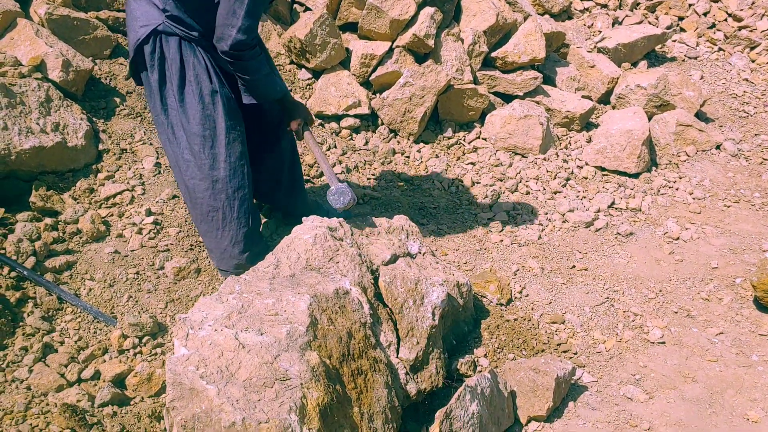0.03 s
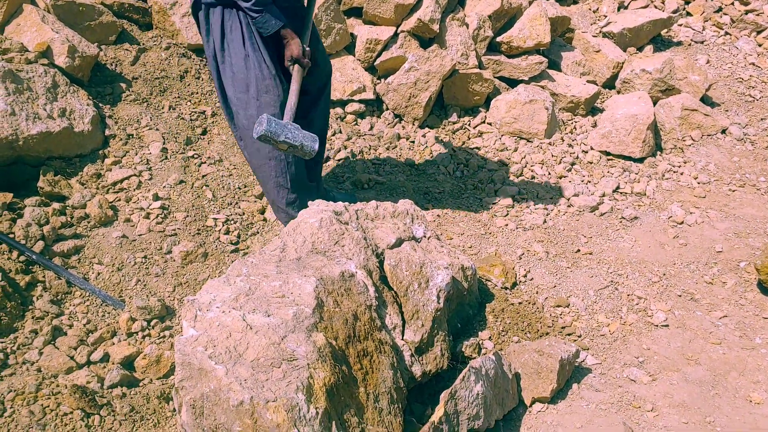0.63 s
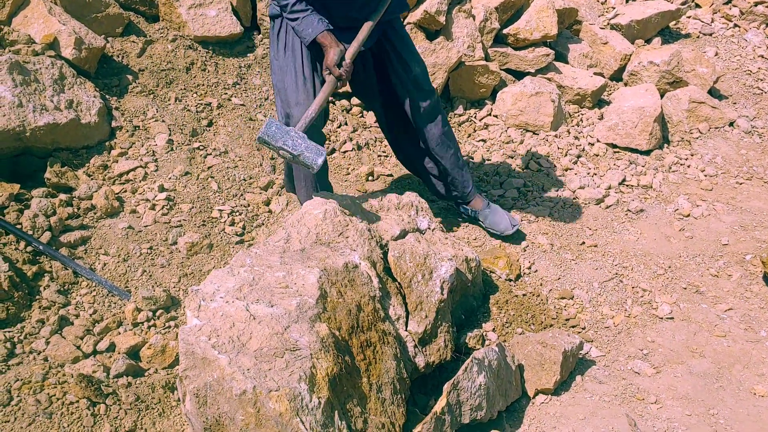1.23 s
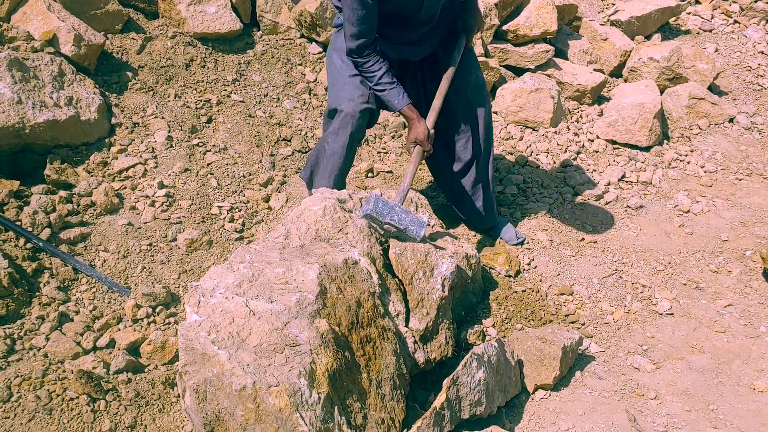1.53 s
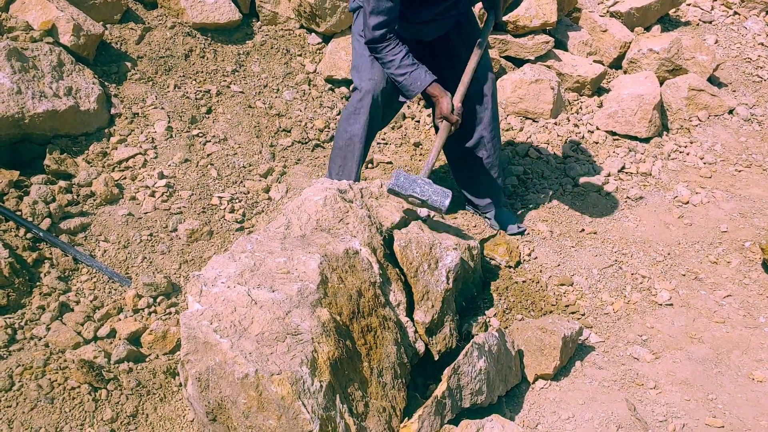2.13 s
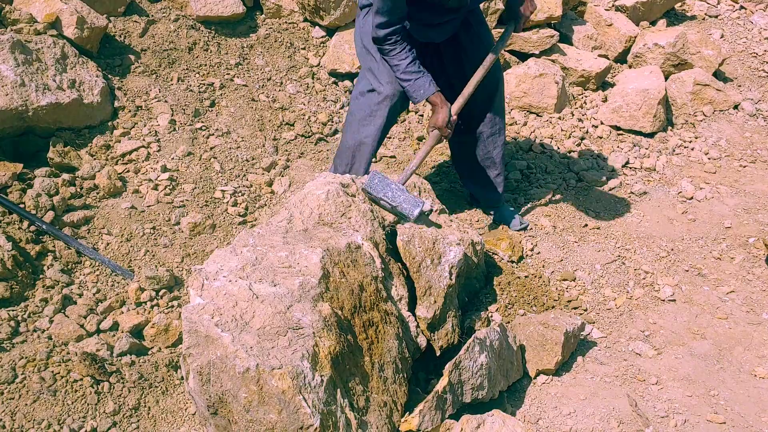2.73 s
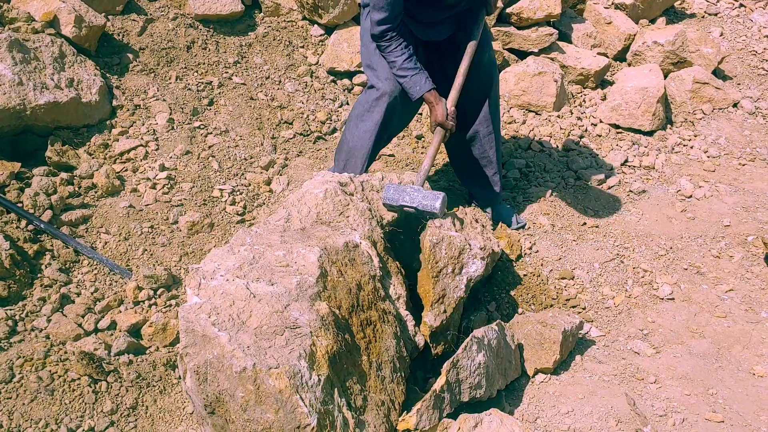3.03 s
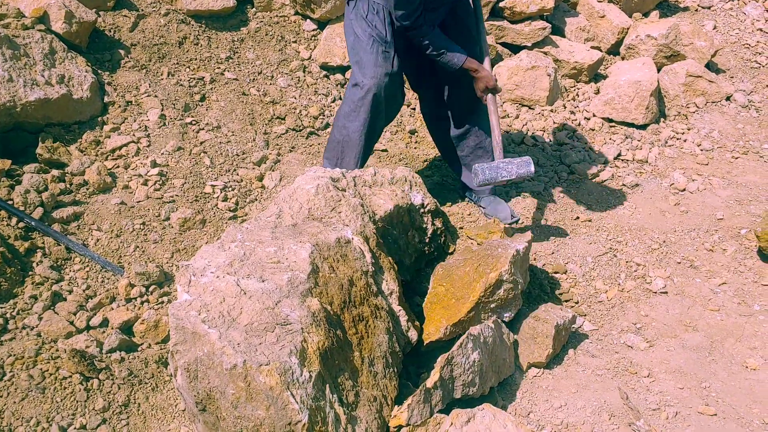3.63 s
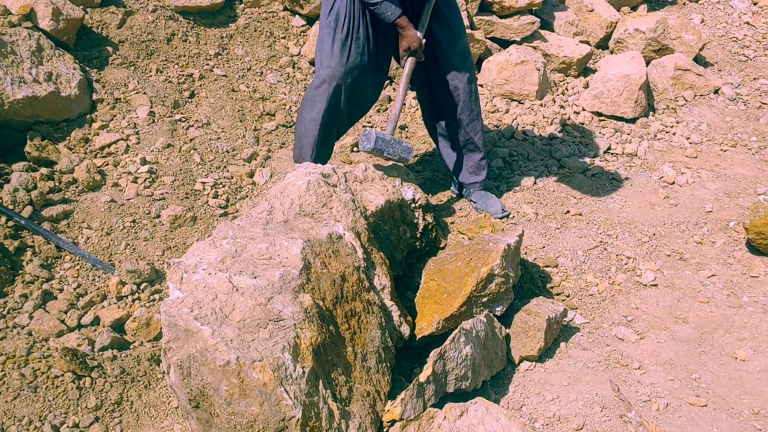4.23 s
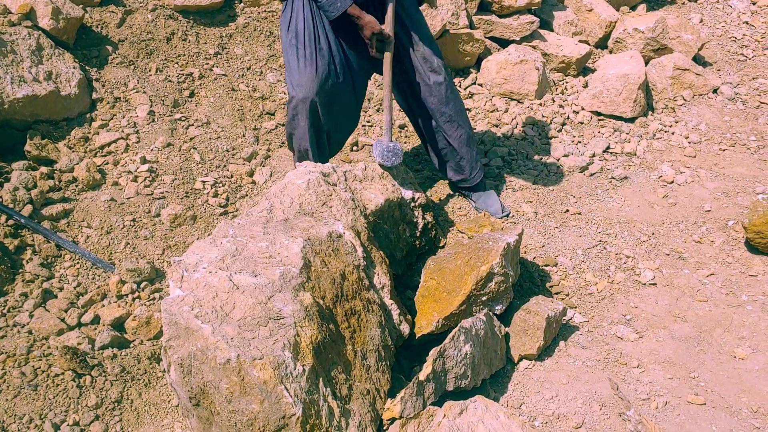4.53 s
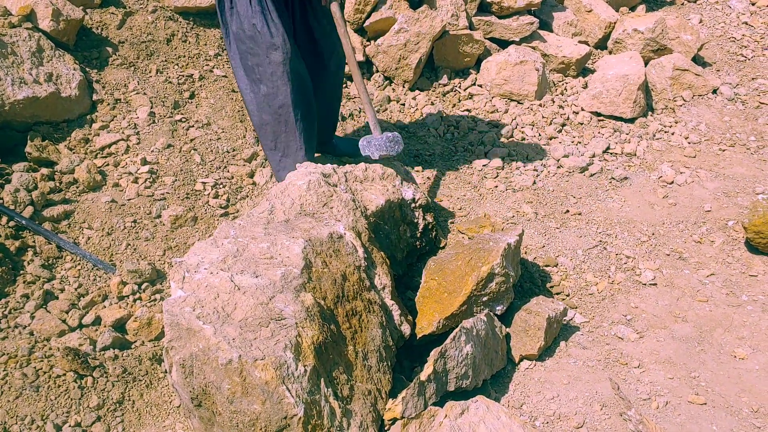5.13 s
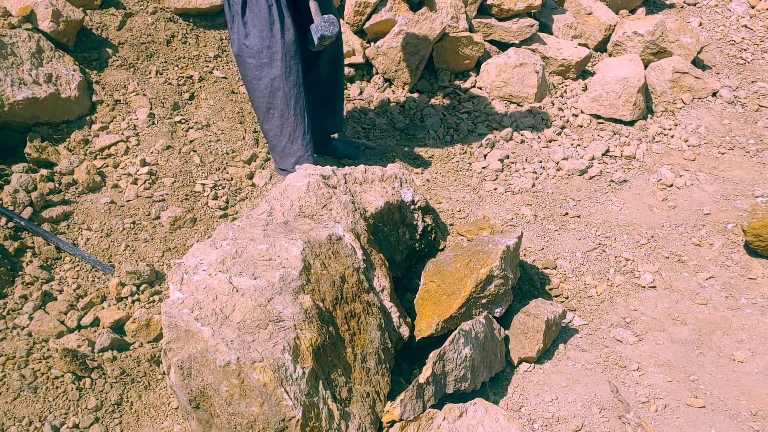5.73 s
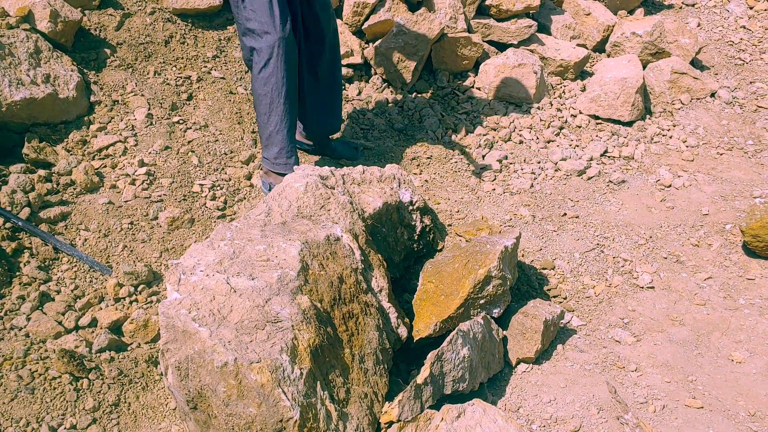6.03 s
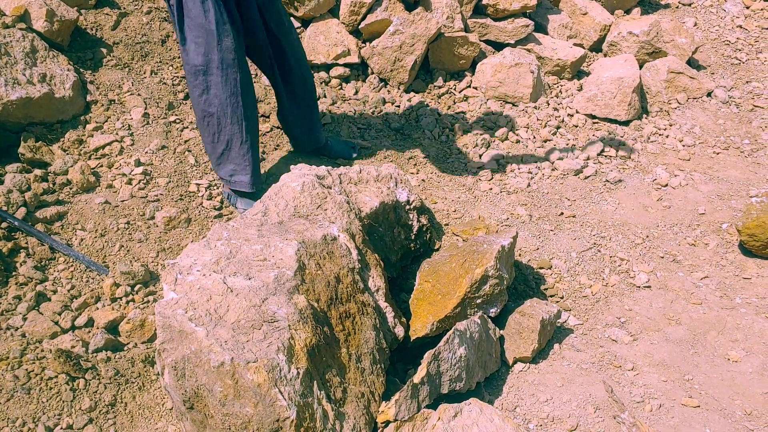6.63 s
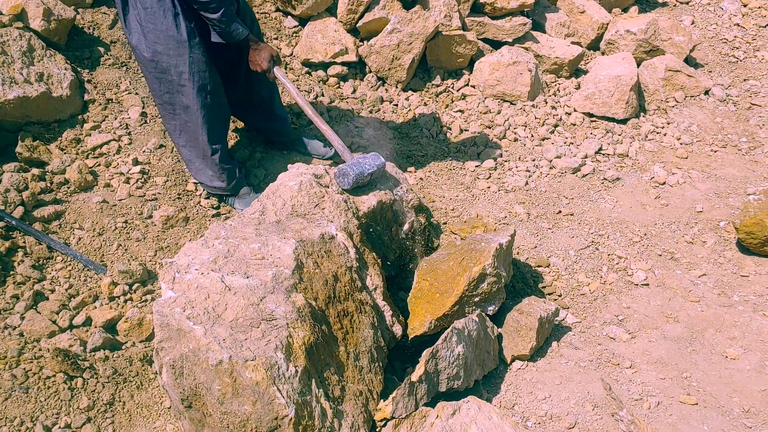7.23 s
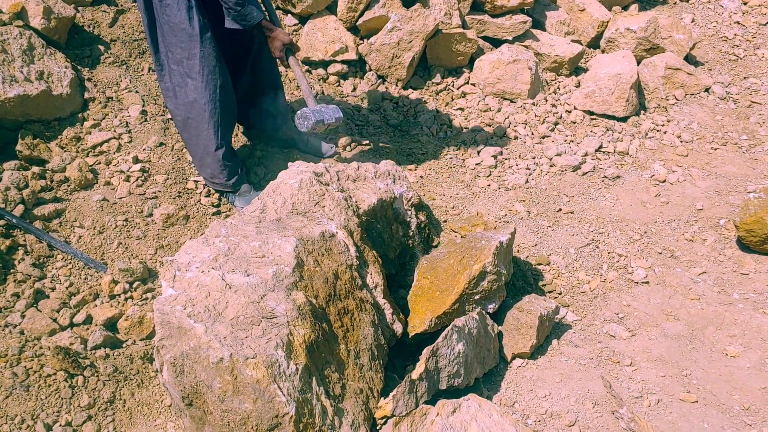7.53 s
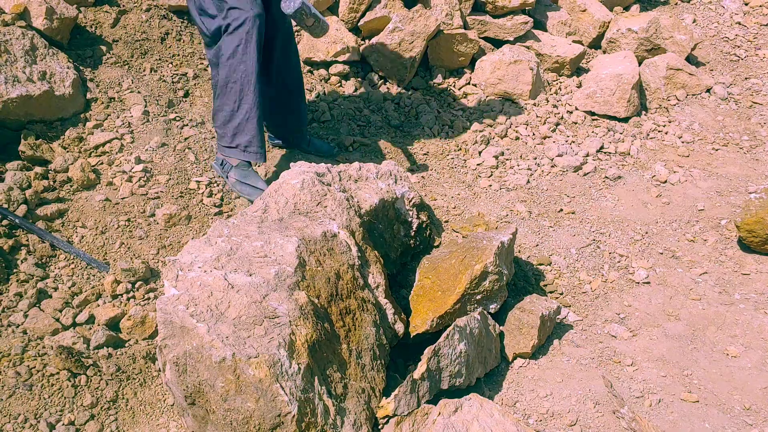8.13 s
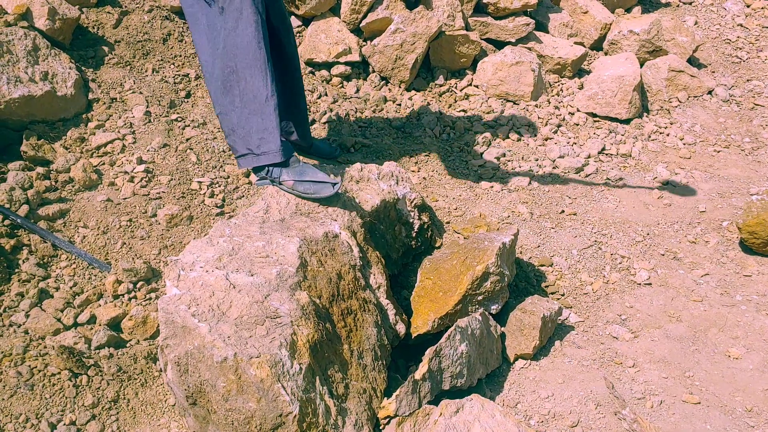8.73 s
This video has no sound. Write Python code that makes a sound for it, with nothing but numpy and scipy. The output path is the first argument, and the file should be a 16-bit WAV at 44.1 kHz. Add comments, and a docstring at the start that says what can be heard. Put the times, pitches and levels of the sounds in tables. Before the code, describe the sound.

A sledgehammer works on a boulder in an open quarry, with very little echo. After a faint gritty scuff, a hard double knock lands at about 1.5 seconds, followed by slight stone grinding and pattering chips. A second sharp blow comes at 2.7 seconds and a lighter knock at 3. From about 3.1 to 3.5 seconds a slab topples and crunches onto rubble, with sliding grit and a soft low rumble. A light tap follows at 4.3 seconds. Between 5 and 7 seconds it is quieter: shoes scuff and low wind gusts buffet the microphone's left side. The hardest blow lands at 7 seconds, a sharp crack with a brief thin steel ring, and crumbs trickle down until about 8. A small stony knock and scuff come at 8.5 seconds. A faint distant rumble and rush continue throughout, with a few barely audible thin chirps.

```python
"""A sledgehammer knocks on a boulder in an open quarry; a slab cracks loose, topples and crunches onto
rubble. Each blow is a dull thud, a burst of tiny fractures and a thin ring of the steel head. Chips
patter, grit slides, shoes scuff, and the rock piles scatter it all back to a two-port stereo microphone.
Gusts buffet the left port; far off lie a faint rumble, a brief throb and a few thin chirps."""
import sys
import numpy as np
from scipy import signal
from scipy.fft import rfft, irfft
from scipy.io import wavfile
from scipy.ndimage import uniform_filter1d

SR = 44100
rng = np.random.default_rng(int(sys.argv[2]) if len(sys.argv) > 2 else 0)


def store_pcm(level_fs):
    """Save levels as 16-bit WAV."""
    pcm = np.round(np.clip(level_fs, -1, 1) * 32767).astype(np.int16)
    wavfile.write(sys.argv[1], SR, np.atleast_2d(pcm).T)


N = 392049
TIME = np.arange(N) / SR
SHORT = TIME[:SR // 4]  # time axis of one contact
COLOUR_HZ = (1000, 3000, 9000)  # the three bands that shape cracks and grit
# colour of breaking stone: (frequency [Hz], gain [dB])
STONE_COLOUR = [(40, -17), (120, -2), (270, 1), (500, 2.5), (700, -5), (1000, -8), (1300, -4), (1800, -4.5),
                (2400, -3.5), (3000, -6.5)]


def hammer_blows():
    """A blow thuds and crushes the surface; at its height the steel rings and the ground gives."""
    # (time [s], thud [dB], thud pitch [Hz], thud swell [ms], crack at 1 kHz [dB], at 3 kHz [dB],
    #  at 9 kHz [dB], crack decay [ms], boulder ring [dB], steel ring [dB], ground bump [dB])
    blows = [ (1.4965, -1, 397, 2.2, 15.5, 4, 0.5, 1.3, -2.5, -55.5, -39.5),
             (1.5306, -2, 996, 1.51, 20, 18.5, -39, 1.46, -3.5, -40.5, -48.5),
             (1.781, -28, 354, 3.9, 2, -13, -55, 10, -6, -58, -44),
             (2.727, -7, 512, 2.4, 20, 18.5, -3, 1.65, 0.5, -46, -36),
             (2.9672, -9, 385.5, 1.96, 8, -16, -39.5, 4.9, -2.5, -63, -30.5),
             (4.2802, -9, 407, 3.55, 0.5, -11, -23.5, 7.4, -9.5, -54, -23.5),
             (6.9937, 1.5, 426.5, 1.1, 31.5, 16, 3, 1.3, -13, -26.5, -36)]
    out = np.zeros(N)
    for s, thud_db, hz, swell_ms, *crack_db, decay_ms, ring_db, steel_db, bump_db in blows:
        swell_s = swell_ms / 1000
        add(out, s, undb(thud_db) * thud(hz, swell_ms))
        add(out, s + swell_s / 2, boulder(fracture(crack_db, decay_ms), ring_db))
        add(out, s + swell_s, undb(steel_db) * hammer_head() + undb(bump_db) * ground())
    return out


def thud(hz, swell_ms):
    """A heavy contact swells and dies within a few cycles."""
    age = SHORT * 1000 / swell_ms
    return (age * np.exp(1 - age)) ** 2 * np.sin(2 * np.pi * hz * SHORT)


def crack(decay_ms, rise_ms=.35):
    """A burst of tiny fractures builds quickly and dies; its spectrum is evened out to unit energy."""
    age_ms = SHORT * 1000
    envelope = np.exp(-age_ms / decay_ms) * (1 - np.exp(-age_ms / rise_ms))
    burst = grains(len(SHORT), share=.4, spread_db=3) * envelope
    spectrum = rfft(burst, 2 * len(SHORT))
    power = uniform_filter1d(np.abs(spectrum) ** 2, size=400, mode="mirror")
    hz = np.linspace(1, SR / 2, len(power))
    flatten_db = -10 * np.log10(np.maximum(power, 1e-9))
    return colour(burst, np.column_stack([hz, flatten_db]))


def fracture(band_db, decay_ms):
    """The surface crushes under a contact; a brief fracture carries little bass."""
    bass_db = band_db[0] + 20 * np.log10(min(decay_ms / 9, 1))
    shape = [(500, bass_db), *zip(COLOUR_HZ, band_db), (11500, band_db[2]), (14500, band_db[2] - 12)]
    return colour(crack(decay_ms), shape)


def boulder(cracks, ring_db):
    """Fractures are heard directly and through the boulder's short resonances."""
    # resonances: (frequency [Hz], width [Hz], gain [dB])
    modes = [(1020, 100, 6), (1620, 90, 4), (1810, 100, 6), (2980, 170, 6), (4020, 350, 5)]
    ring = sum(undb(db + ring_db) * band(cracks, hz, width) for hz, width, db in modes)
    return colour(cracks + ring, STONE_COLOUR)


def hammer_head():
    """The steel rings thinly after a clean contact."""
    # modes of the head: (frequency [Hz], relative level [dB], t60 [s])
    modes = [(6200, 0, .09), (6222, -17, .19), (6885, -7, .15), (10400, -15, .14)]
    return sum(undb(db - 60 * SHORT / t60) * np.sin(2 * np.pi * hz * SHORT) for hz, db, t60 in modes)


def ground():
    """The soil under the boulder gives with a deep bump and a shorter, higher one."""
    return thud(hz=52, swell_ms=10) + undb(-2.5) * thud(hz=152, swell_ms=3.8)


def rock_knocks(swell_cycles=.7, bump_db=-22.5):
    """Rock knocks on rock, and once the hammer head drops back onto the stone without ringing; deeper thuds
    swell more slowly, heavier ones bump the ground more."""
    # (time [s], thud [dB], thud pitch [Hz], crack [dB], brightness [dB/octave], crack decay [ms])
    knocks = [ (1.5329, -9, 283, 19, -11, 7.8), (1.7636, -40, 297, 0.5, -10, 9),
              (2.7106, -23.5, 416, -8.5, 0.5, 9.6), (2.7299, -8, 297, 13, -9, 3.4),
              (2.7462, -14, 397, 10, -14, 7.4), (3.147, -38.5, 258, 0, -6, 1.2),
              (3.209, -38, 249, -2, -4, 17), (3.1796, -19, 285, -4.5, -5.5, 12),
              (3.244, -12.5, 211, 15, -4, 10), (3.2566, -13.5, 381, 11.5, -7.5, 2.4),
              (3.2792, -15, 290, 8, -8.5, 16), (3.2868, -21.5, 425, 6, -6.5, 1.4),
              (3.311, -23.5, 320, 2, -6.5, 15), (4.308, -24, 356, -19.5, -7, 5),
              (7.0875, -31.5, 308, -9.5, -15, 1.8), (7.161, -22.5, 354, 6.5, -2, 2.26),
              (7.177, -41.5, 309, -24, 3, 5.6), (7.333, -29.5, 277, -20, 0, 19),
              (8.179, -44.5, 800, -18.5, -12, 5.1), (8.4817, -36, 945, 3, -14.5, 2.2),
              (8.544, -45.5, 610, -15.5, -17.5, 6)]
    thuds, cracks = np.zeros((2, N))
    for s, thud_db, hz, crack_db, bright_db, decay_ms in knocks:
        swell_s = swell_cycles / hz
        body = thud(hz, swell_s * 1000) + undb(bump_db) * ground()
        add(thuds, s, undb(thud_db) * body)
        band_db = tilt(crack_db, bright_db, top_db=-6)  # stone on stone is dull at the top
        add(cracks, s + swell_s / 2, fracture(band_db, decay_ms))
    return thuds + boulder(cracks, ring_db=2.5)


def slab_grinding(push_s=.032):
    """The loosened slab rubs in its bed in a few short pushes that stir its resonances."""
    # pushes: (peak time [s], level [dB])
    pushes = [(1.60, -48), (1.698, -42.5), (1.784, -48.5)]
    # the slab's resonances: (frequency [Hz], relative level [dB])
    modes = [(290, -5.5), (1000, 0)]
    rubbing = sum(undb(db) * swell(TIME - s, push_s, push_s) for s, db in pushes)
    return rubbing * sum(undb(db) * narrow_noise(hz, width_hz=230) for hz, db in modes)


def ground_rumble(peak_s, rise_s, fall_s, db):
    """The ground rumbles while the slab topples and settles."""
    return undb(db) * swell(TIME - peak_s, rise_s, fall_s) * narrow_noise(hz=46, width_hz=70)


def falling_chips():
    """Single chips tick down among showers of smaller crumbs, which break up as they land."""
    # the loudest chips and pebbles: (time [s], level [dB], brightness [dB/octave])
    landings = [(0.5996, -16.5, -21.5), (0.6078, -25.5, 4), (1.645, -8.5, -4.5), (1.6734, -11, 0.5),
                (1.705, -26, -1), (1.844, -23.5, -1.5), (2.0405, -19, -11), (2.762, -3, -8),
                (2.976, -5.5, -13.5), (3.4021, -15.5, -6.5), (5.2411, -16.5, -1), (7.1859, -17, -1),
                (7.312, -14, -12), (7.389, -17.5, -17), (7.352, -26.5, 7.5), (7.3789, -18, -3.5),
                (7.489, -22, -13), (7.582, -36, 5), (7.6259, -27.5, 3), (7.886, -18.5, -1)]
    # crumbs thrown up by a break: (start [s], length [s], starting level [dB])
    showers = [(1.679, 0.57, -29.5), (3.3, .25, -28), (7.191, .5, -27)]
    out = np.zeros(N)
    for s, db, bright_db in landings:
        add(out, s, chip(db, bright_db, decay_ms=1.5))
    for row in showers:
        for s, db, bright_db in shower(*row, count=14):
            add(out, s, chip(db, bright_db, decay_ms=3.2))
    return out


def shower(start, length, db, count, fade_db_per_s=13, scatter_db=4.5, bright_db=-4.5):
    """Crumbs land unevenly, the late ones weaker: (time [s], level [dB], brightness [dB/octave])."""
    ages = length * (np.arange(count) + rng.random(count)) / count
    size, hue = scatter_db * rng.standard_normal((count, 2)).T
    return zip(start + ages, db - fade_db_per_s * ages + size, bright_db + hue)


def chip(db, bright_db, decay_ms):
    """A small stone ticks and clinks once."""
    shape = [(200, -4), (1000, -11 - bright_db), (3000, -1.5),
             (12000, 2 * bright_db - 10), (15000, 2 * bright_db - 36.5)]
    tick = colour(crack(decay_ms), shape)
    add(tick, 0, undb(-19.5) * clink(low_hz=1410, high_hz=6550, cycles=17))
    return undb(db) * tick


def clink(low_hz, high_hz, cycles):
    """One pebble of random size rings in three short modes, with unit energy."""
    hz = low_hz * (high_hz / low_hz) ** rng.random((3, 1))
    t = TIME[:SR // 20]
    ring = np.sum(np.exp(-t * hz / cycles) * np.sin(2 * np.pi * hz * t), axis=0)
    return ring / np.linalg.norm(ring)


def sliding_grit():
    """Grit slides under hammer, slab and shoes: swells of fine grains with pebbles clinking in them."""
    # slides: (peak time [s], rise [s], fall [s], level [dB], brightness [dB/octave])
    slides = [(.015, 0.059, 0.02, -40, -3), (.612, 0.023, .08, -40, -8.5), (1.361, 0.069, .04, -47, -4.5),
              (1.602, .034, .03, -31.5, -11.5), (1.69, 0.04, .09, -38, -3), (2.41, .04, .05, -55, -7),
              (3.161, 0.32, .06, -39.5, -5), (3.33, 0.038, .10, -34.5, -4.5), (3.52, 0.079, .04, -40, -6),
              (4.60, 0.15, .08, -50, -5.5), (5.242, 0.039, .03, -42, -5), (6.36, .059, .07, -39.5, -5),
              (6.95, .07, .11, -37, -4), (7.30, 0.12, .15, -50.5, -2.5), (7.62, 0.16, .06, -44.5, -10.5),
              (7.90, .023, .04, -43.5, -4.5), (8.475, .035, 0.073, -40, -7)]
    out = np.zeros(N)
    for s, rise, fall, db, bright_db in slides:
        start = max(s - 3 * rise, 0)
        pebbles = np.zeros(N)
        for when, smallness in rng.random(size=(130, 2)):
            add(pebbles, when, undb(21.5 - 12 * smallness) * clink(low_hz=1026, high_hz=4570, cycles=12))
        sand = undb(.5) * grains(SR, share=.15, spread_db=4)
        rub = (sand + pebbles[:SR]) * swell(TIME[:SR] + start - s, rise, fall)
        band_db = tilt(db, bright_db, top_db=-8.5)
        add(out, start, colour(rub, list(zip(COLOUR_HZ, band_db))))
    uneven_push = undb(2 * walk(rate_hz=90))
    return colour(out, STONE_COLOUR) * uneven_push


def rock_piles(x, near_db, near_t60, far_db, far_t60):
    """Dull scatter from stones close by, then a faint tail from the slopes; the bass is near mono."""
    t = TIME[:SR]
    onset = 1 - np.exp(-(t / .003) ** 2)
    fade = onset * (undb(near_db - 60 * t / near_t60) + undb(far_db - 60 * t / far_t60))
    mid_colour = [(100, 2.5), (260, 3), (450, -3.5), (800, -5.5), (2400, -5), (4000, -11.5), (9000, -10)]
    side_colour = [(200, -13.5), (1000, -4.5), (2400, -.5), (4000, -12), (9000, -11.5)]
    mid = colour(rng.standard_normal(SR) * fade, mid_colour)
    side = colour(rng.standard_normal(SR) * fade, side_colour)
    return np.array([signal.fftconvolve(x, mid + sign * side)[:N] for sign in (1, -1)])


def wind(fall_s=.042, port_db=(4.5, -24)):
    """Eddies thump the left port and barely touch the right; strong gusts shed smaller, higher ones."""
    # gusts at the microphone: (peak time [s], build-up [s], strength [dB])
    gusts = [(5.07, 0.074, -40.5), (5.18, 0.06, -32), (5.42, 0.1, -40), (5.835, .1, -30),
             (5.99, 0.036, -43), (6.36, .04, -47), (6.75, 0.085, -32.5), (6.92, 0.13, -38.5),
             (8.71, .07, -43.5), (8.83, .06, -45.5)]
    # colour of the large eddies: (frequency [Hz], gain [dB])
    buffet_colour = [(15, -15), (40, 1), (60, 5), (90, -4.5), (140, -11.5), (220, -41), (400, -49),
                     (1000, -82)]
    # colour of the small eddies: (frequency [Hz], gain [dB])
    swirl_colour = [(50, -10.5), (120, 2.5), (200, 0), (300, -20.5), (600, -51.5), (2000, -89)]
    strength = sum(undb(db) * swell(TIME - s, build, fall_s) for s, build, db in gusts)
    eddies = colour(rng.standard_normal(N), buffet_colour)
    eddies /= np.sqrt(uniform_filter1d(eddies ** 2, size=2000) + 1e-12)  # the gusts alone set the level
    swirl = unit(colour(rng.standard_normal(N), swirl_colour)) * undb(17.5) * strength
    return np.outer(undb(port_db), (eddies + swirl) * strength)


def far_throb(hz, rate_hz, beat_s):
    """Something throbs unevenly far off, swelling once and fading."""
    beat = .65 + .35 * np.cos(2 * np.pi * rate_hz * (TIME - beat_s) + .8 * walk(rate_hz=5))
    envelope = undb(-56) * swell(TIME - .99, rise_s=.83, fall_s=1)
    return narrow_noise(hz, width_hz=380) * beat * envelope


def far_chirps():
    """Now and then a thin chirp carries over, its tone smeared by distance."""
    # (peak time [s], half-length [s], pitch [Hz], level [dB])
    chirps = [(1.361, 0.026, 2220, -53), (2.41, 0.085, 2250, -61.5), (4.584, 0.15, 2360, -67),
              (3.89, 0.192, 2370, -70), (6.617, .12, 2180, -71), (8.433, 0.023, 2070, -61.5)]
    return sum(undb(db) * np.exp(-((TIME - s) / half_length) ** 2) * narrow_noise(hz, width_hz=380)
               for s, half_length, hz, db in chirps)


def far_air(rush_band_hz=(900, 3200)):
    """Low rumble and a wavering far-off rush, wider in the stereo image towards the treble."""
    # colour of the distant background: (frequency [Hz], gain [dB])
    air_colour = [(20, 0), (38, 9.5), (70, -1.5), (120, -1), (220, -15), (420, -10.5), (700, -19.5),
                  (1300, -18.5), (2300, -24.5), (3300, -36.5), (5000, -46.5), (9000, -55.5), (16000, -62.5)]
    # slow drift of its upper midrange: (time [s], gain [dB])
    rush_drift = [(0, 3), (1.8, 3), (3.2, 0.5), (8.89, 1.9)]
    mid, side = (unit(colour(rng.standard_normal(N), air_colour)) for _ in range(2))
    side = colour(side, [(40, -9.5), (120, -11.5), (400, -10), (1200, -6.5), (2500, -.5)])
    air = np.array([mid + side, mid - side])
    rush = signal.sosfilt(signal.butter(1, rush_band_hz, "band", fs=SR, output="sos"), air)
    rush_gain = undb(np.interp(TIME, *np.transpose(rush_drift)) + walk(rate_hz=12))
    return (air - rush + rush * rush_gain) * undb(-54.5 + .8 * walk(rate_hz=4.5))


def undb(db):
    """Decibels to gain."""
    return 10 ** (np.asarray(db) / 20)


def unit(x):
    """Scale to rms 1."""
    return x / np.sqrt(np.mean(x ** 2))


def add(track, s, x):
    """Mix x into the track from time s on."""
    i = max(int(s * SR), 0)
    track[i:i + len(x)] += x[:N - i]


def colour(x, points, size=8192):
    """Causal filter through (frequency [Hz], gain [dB]) points, built from the cepstrum."""
    hz, db = np.transpose(points)
    grid = np.maximum(np.fft.rfftfreq(size, 1 / SR), 1)
    gain = undb(np.interp(np.log(grid), np.log(hz), db))
    cepstrum = irfft(np.log(gain))
    cepstrum[1:size // 2] *= 2
    cepstrum[size // 2 + 1:] = 0
    impulse = irfft(np.exp(rfft(cepstrum)))
    return signal.fftconvolve(x, impulse)[:len(x)]


def tilt(db, bright_db, top_db):
    """Levels at the three colour bands, from a level, a slope per octave and a droop at the top."""
    octaves = np.log2(np.array(COLOUR_HZ) / COLOUR_HZ[0])
    return db + bright_db * octaves + np.array([0, 0, top_db])


def band(x, hz, width_hz):
    """One resonance, gain 1 at its centre."""
    return signal.lfilter(*signal.iirpeak(hz, hz / width_hz, fs=SR), x)


def narrow_noise(hz, width_hz):
    """Noise passed twice through one resonance, at rms 1."""
    return unit(band(band(rng.standard_normal(N), hz, width_hz), hz, width_hz))


def grains(count, share, spread_db):
    """Tiny fractures on a share of the samples: many small, a few large."""
    sizes = undb(spread_db * np.minimum(rng.exponential(size=count), 5))
    return unit(rng.choice([-1, 1], count) * sizes * (rng.random(count) < share))


def swell(t, rise_s, fall_s):
    """Builds smoothly to 1 at t = 0, then dies away."""
    return np.exp(-np.where(t < 0, (t / rise_s) ** 2, t / fall_s))


def walk(rate_hz):
    """Smooth random drift at rms 1."""
    hold = int(SR / rate_hz)
    steps = np.repeat(rng.standard_normal(N // hold + 1), hold)
    return unit(uniform_filter1d(uniform_filter1d(steps, hold), hold)[:N])


def scene():
    """At the microphone: work on the boulder, the quarry's scatter, the far background and the wind."""
    work = hammer_blows() + rock_knocks() + falling_chips() + sliding_grit() + slab_grinding()
    work += ground_rumble(peak_s=3.35, rise_s=.42, fall_s=.4, db=-46)
    direct = np.array([work, np.roll(work, shift=2)])  # the sound reaches the left port first
    scatter = rock_piles(work, near_db=-39, near_t60=.13, far_db=-67, far_t60=.48)
    background = far_air() + far_throb(hz=1290, rate_hz=8.5, beat_s=.93) + far_chirps()
    return direct + scatter + background + wind()


def record(dry):
    """The microphone's left port whistles near 6.5 kHz, the right is muffled; the hardest blows clip."""
    # response of the two ports: (frequency [Hz], left gain [dB], right gain [dB])
    ports = [(300, 1.5, 3), (1000, -1, 1), (1550, 0, -1.5), (2370, -1.5, -10), (2880, -5.5, -4.5),
             (3900, -0.5, -4.5), (5000, 0, -8.5), (6482, 9.5, -13), (7180, -7.5, -21.5),
             (11000, -0.5, -22.5), (12200, -7.5, -20), (13000, -21.5, -28), (16000, -25.5, -28)]
    left = colour(dry[0], [(hz, db) for hz, db, _ in ports])
    right = colour(dry[1], [(hz, db) for hz, _, db in ports])
    clipped = np.clip([left, right], -1, 1)
    steep_lowpass = signal.ellip(8, .2, 70, 16500, fs=SR, output="sos")
    return signal.sosfilt(steep_lowpass, clipped)


dry = scene()
out = record(dry)
store_pcm(out)
```